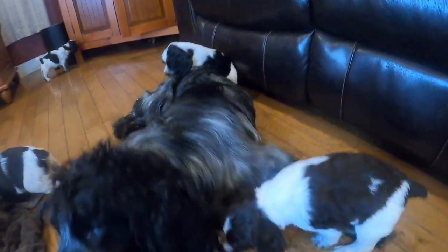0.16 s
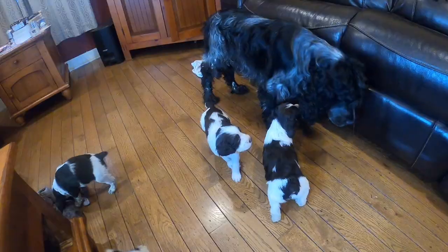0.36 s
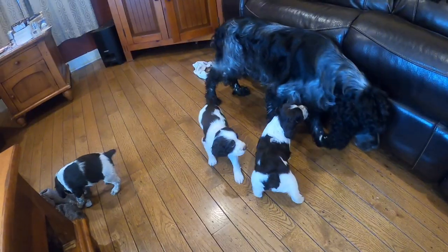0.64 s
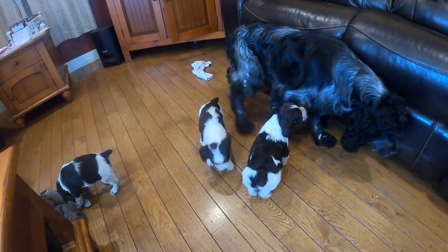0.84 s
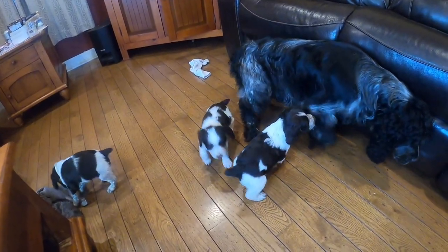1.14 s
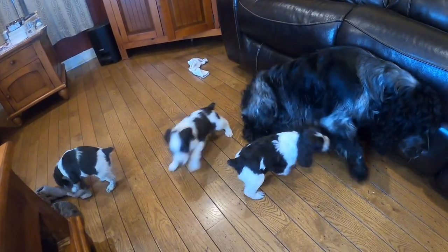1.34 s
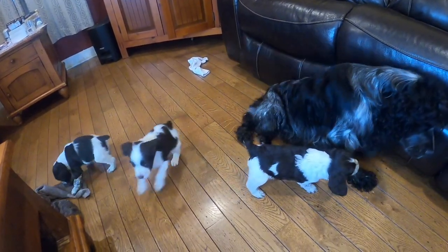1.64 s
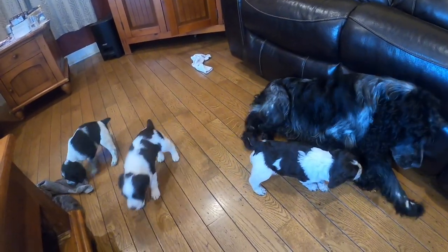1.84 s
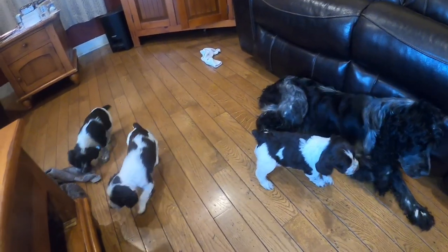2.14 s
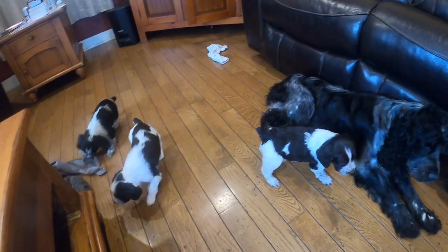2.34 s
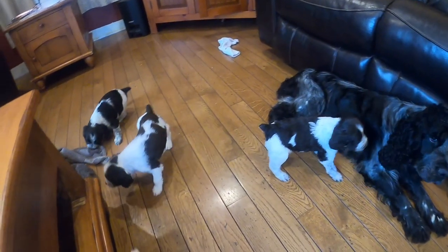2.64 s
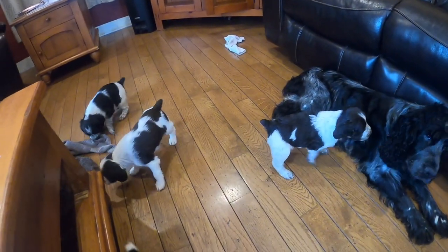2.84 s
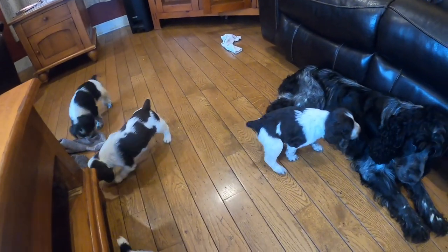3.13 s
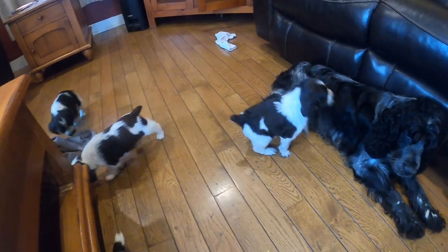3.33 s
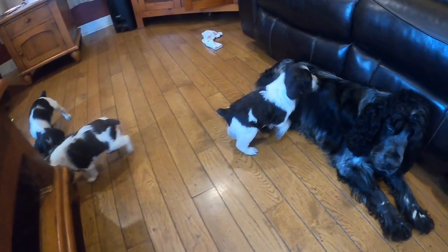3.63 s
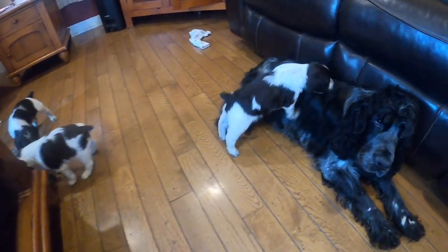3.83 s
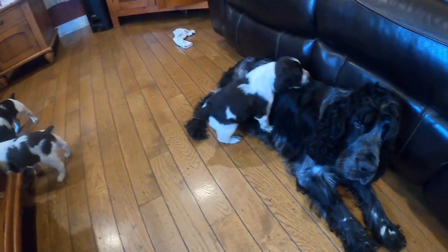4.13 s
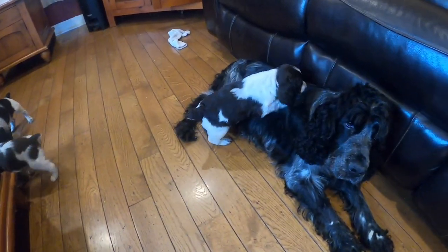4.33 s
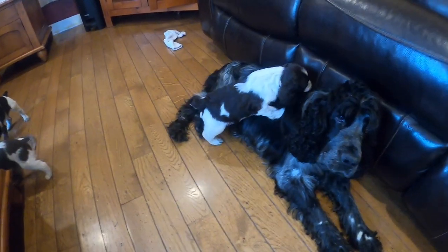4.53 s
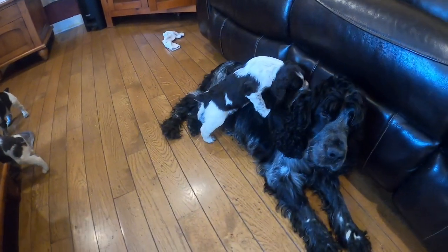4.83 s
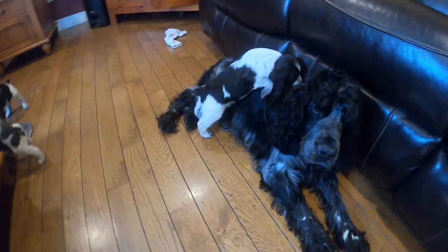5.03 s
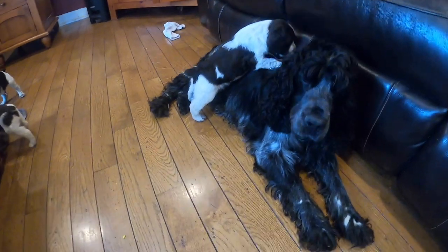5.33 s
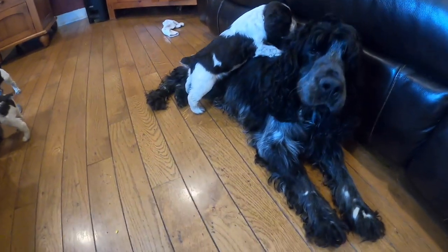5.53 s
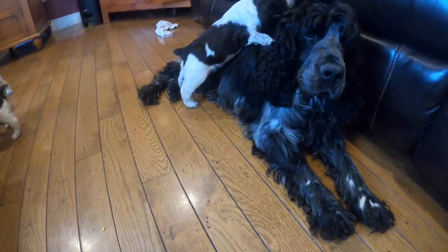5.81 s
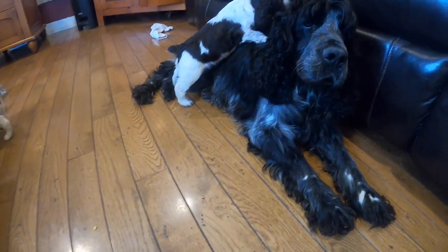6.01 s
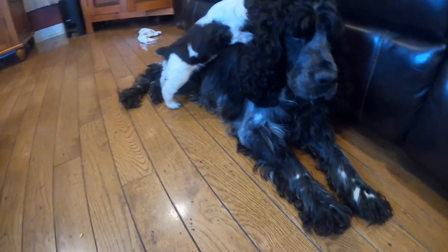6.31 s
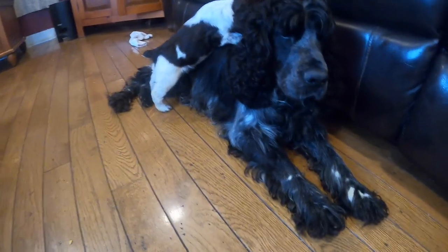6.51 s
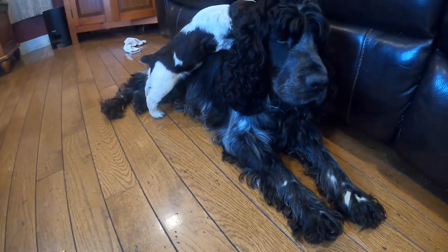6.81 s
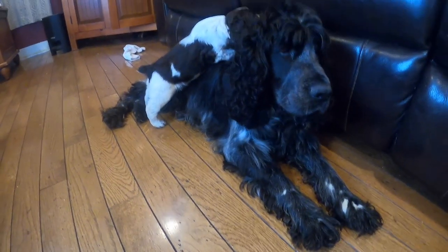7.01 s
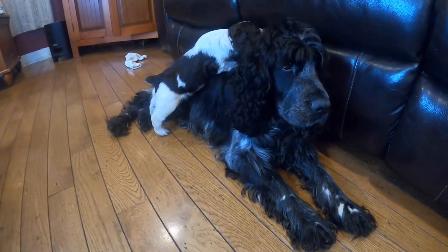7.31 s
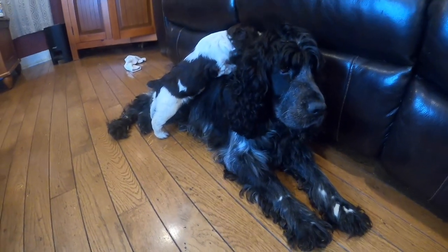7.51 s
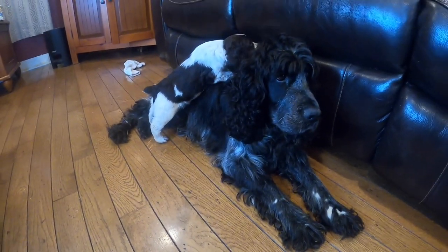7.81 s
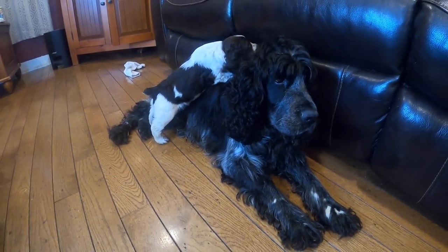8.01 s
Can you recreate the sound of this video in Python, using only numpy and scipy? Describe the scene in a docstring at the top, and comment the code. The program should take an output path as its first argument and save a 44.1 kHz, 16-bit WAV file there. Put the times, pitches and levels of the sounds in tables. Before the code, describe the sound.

Soft paw thumps, dull limb knocks, claw ticks and coat rustling on wooden boards in a quiet living room, fading to near stillness.

```python
"""In a quiet living room with a hardwood floor, puppies scuffle and a big dog lies down by a sofa.
Paws and elbows are soft impulses that ring the floor's modes; claws are chattering noise with a ringing note.
Scratches and padded knocks are trains of stick-slip jumps; sliding pads and coats are friction noise.
A puppy's grunt is a swelling low tone, and a struck collar tag rings once in blurred modes.
Fingers rock the hand-held camera and a nail once taps its shell, over a low rumble and the hush of the house."""
import sys
import numpy as np
from scipy import signal
from scipy.fft import rfft, irfft, next_fast_len
from scipy.io import wavfile
from scipy.ndimage import uniform_filter1d

SR = 44100
rng = np.random.default_rng(int(sys.argv[2]) if len(sys.argv) > 2 else 0)


def wrap_up_sound(samples):
    """Save the sound to the file named by the first command line argument, as 16-bit audio."""
    columns = np.atleast_2d(samples).T
    # keep every value between -1 and 1, then stretch to whole-number steps
    tamed = np.clip(columns, -1, 1)
    steps = np.round(tamed * 32767).astype(np.int16)
    wavfile.write(sys.argv[1], SR, steps)


N = 359706  # samples


def amp(db):
    """Level: decibels become an amplitude gain."""
    return 10 ** (np.asarray(db) / 20)


def unit(x):
    """Normalisation: scaled to rms 1."""
    return x / np.sqrt(np.mean(x ** 2) + 1e-20)


def crest(x):
    """Normalisation: scaled to peak 1."""
    return x / (np.abs(x).max() + 1e-20)


def along(points, hz):
    """Interpolation: (Hz, value) points read on a log frequency axis."""
    f, v = np.transpose(points)
    return np.interp(np.log(hz + 1), np.log(f + 1), v)


def hump(hz, centre_hz, octaves):
    """Resonance band: a bell of height 1 on a log frequency axis."""
    return np.exp(-(np.log2((hz + 1) / centre_hz) / octaves) ** 2)


def filtered(x, response):
    """Linear filtering: the spectrum of x times a response of frequency."""
    n = x.shape[-1]
    m = next_fast_len(n + SR // 10)
    spectrum = rfft(x, m) * response(np.fft.rfftfreq(m, 1 / SR))
    return irfft(spectrum, m)[..., :n]


# Left-right correlation of diffuse sound. Each row: frequency in Hz, likeness from 0 to 1.
STEREO_LIKENESS = [(60, 0.84), (150, 0.41), (300, 0.29), (1000, 0.39), (2500, 0.52), (4500, 0.053),
                   (12000, 0.033)]


def spread(pair, spectrum, alike=STEREO_LIKENESS):
    """Interaural coherence: two unrelated signals become coloured stereo of rms 1 and given likeness."""
    turn = lambda hz: np.arccos(np.clip(along(alike, hz), -1, 1)) / 2
    mid_side = lambda hz: np.array([np.cos(turn(hz)), np.sin(turn(hz))])
    mid, side = filtered(pair, lambda hz: amp(along(spectrum, hz)) * mid_side(hz))
    return unit(np.array([mid + side, mid - side]))


def panned(sound, pan_db):
    """Level difference: the sound leans left by pan_db."""
    return sound * amp([[pan_db / 2], [-pan_db / 2]])


def add(track, s, sound):
    """Superposition: a sound joins the track at s seconds."""
    start = max(round(s * SR), 0)
    track[..., start:start + sound.shape[-1]] += sound[..., :N - start]


def push(hz, cycles):
    """Soft impact: a compliant contact gives a swing of a cycle or two, of peak 1."""
    t = np.arange(SR // 2) / SR
    age = t * hz / cycles
    return crest(age ** 2 * np.exp(-age) * np.sin(2 * np.pi * hz * t))


def swell(length, rise, t60):
    """Energy envelope: the power of one movement rises, holds and dies away (all in seconds)."""
    t = np.arange(int((length + t60) * SR)) / SR
    onset = np.clip(t / rise, 0, 1)
    release = amp(-60 * np.clip((t - length) / t60, 0, 1))
    return (onset * release) ** 2


def struck(blows, modes, rise_s, blur):
    """Modal ringing: shifting contact blurs each mode, which reaches the two sides out of step."""
    out, t = np.zeros((2, N)), np.arange(SR // 2) / SR
    for s, db in blows:
        for hz, level, t60, pan_db in modes:
            unrest = filtered(rng.standard_normal(len(t)), lambda f: f < hz / 10)
            drift = np.cumsum(unrest) * np.sqrt(2 * np.pi * blur * hz / SR)
            phase = rng.random() + rng.random((2, 1)) / 4  # in cycles
            decay = np.clip(t / rise_s, 0, 1) * amp(db + level - 60 * t / t60)
            ring = decay * np.sin(2 * np.pi * (hz * t + phase) + drift)
            add(out, s, panned(ring, pan_db))
    return out


# Reverberation of the room. Each row: frequency in Hz, decay time t60 in seconds.
ROOM_DECAY = [(100, 0.29), (500, 0.52), (2500, 0.28), (6000, 0.49), (12000, 0.35)]


def echo(sound):
    """Reverberation: diffuse noise decaying band by band, drawn anew at each call for each spot on the floor."""
    noise = spread(rng.standard_normal((2, SR // 2)), [(100, 0)])
    hz, t, z = signal.stft(noise, SR, nperseg=256)
    decay = amp(-60 * t / along(ROOM_DECAY, hz)[:, None])
    tail = signal.istft(z * decay, SR)[1]
    tail = tail / np.linalg.norm(tail[0])
    return signal.fftconvolve(sound[None], tail, axes=1)[:, :len(sound)]


# Spectrum of the still room. Each row: frequency in Hz, relative level in dB per Hz.
HUSH_SPECTRUM = [(20, -15.5), (55, -22), (110, -35), (145, 0.5), (230, -8), (400, -14.5), (620, -12),
                 (850, -22), (1150, -17), (2200, -29.5), (3500, -37), (4300, -57), (7500, -35.5),
                 (14000, -59)]


def hush(hush_db=-69):
    """Stationary noise: the steady air of the house."""
    return amp(hush_db) * spread(rng.standard_normal((2, N)), HUSH_SPECTRUM)


PAW_HZ = 137.4  # pitch of a landing of middling weight
TREMOR_DB = -72  # rumble of the hand at rest
JOLT_DB, JOLT_DB_PER_OCTAVE = -22, -7  # heavy, low-pitched landings shake the camera more
JOLT_RISE_S, JOLT_HOLD_S, JOLT_T60 = 0.008, 0.032, 0.96
NUDGE_JOLT_T60 = 0.41  # the hand steadies the camera quickly (s)
# Spectrum of the swaying camera. Each row: frequency in Hz, relative level in dB per Hz.
RUMBLE_SPECTRUM = [(12, 2.5), (22, 19.5), (45, 7.5), (65, -11), (100, -32), (250, -92)]


def rumble():
    """Energy addition: the hand trembles, and each listed landing or nudge adds a burst of low noise power."""
    power = np.full(N, amp(TREMOR_DB) ** 2)
    for blows, t60 in (LANDINGS, JOLT_T60), (NUDGE_TOUCHES, NUDGE_JOLT_T60):
        for s, db, hz, *_ in blows:
            jolt = amp(db + JOLT_DB + JOLT_DB_PER_OCTAVE * np.log2(hz / PAW_HZ))
            add(power, s, jolt ** 2 * swell(JOLT_HOLD_S, JOLT_RISE_S, t60))
    return np.sqrt(power) * spread(rng.standard_normal((2, N)), RUMBLE_SPECTRUM)


# Fingers press on the camera's right side. Each row: start in seconds, level in dB, pitch in Hz.
NUDGE_TOUCHES = [(0.012, -46, 16), (3.193, -33, 60), (3.242, -32.5, 89), (4.565, -31, 128)]
# A fingernail taps the camera's shell. Each row: start in seconds, level in dB.
NAIL_TAPS = [(3.2365, -39)]
# Modes of the shell. Each row: frequency in Hz, relative level in dB, t60 in seconds, left-right in dB.
SHELL_MODES = [(134.5, 5, 0.2, -15), (535, -8, 0.08, -5), (1045, -3, 0.08, -10), (1590, -3, 0.07, 3),
               (1880, 1, 0.08, 0), (2150, -2, 0.04, 1), (3080, 7, 0.022, 7), (3640, 6, 0.018, -1),
               (4020, 10, 0.02, 0), (5130, 6, 0.014, 0), (5900, 5, 0.02, -10)]
# Crack of the nail itself. Each row: frequency in Hz, relative level in dB per Hz.
CRACK_SPECTRUM = [(700, -34), (1000, -2), (1800, 0), (2600, -10), (3800, 2), (6000, -10), (7500, -1),
                  (10000, -28), (14000, -45)]


def handling(far_side_db=-15, shell_db=0, crack_db=12, crack_t60=0.0065, room_db=-14):
    """Rigid-body rocking and shell modes: fingers swing the camera; a nail's tap rings it and the room."""
    touches, t = np.zeros((2, N)), np.arange(SR // 3) / SR
    for s, db, hz in NUDGE_TOUCHES:
        add(touches, s, amp(db) * push(hz, cycles=0.58))
    taps = amp(shell_db) * struck(NAIL_TAPS, SHELL_MODES, rise_s=0.00083, blur=0.024)
    for s, db in NAIL_TAPS:
        nail = rng.standard_normal((2, len(t))) * amp(-60 * t / crack_t60) * (1 - np.exp(-t / 0.0003))
        add(taps, s, amp(db + crack_db) * crest(spread(nail, CRACK_SPECTRUM)))
    rocking = np.array([[-amp(far_side_db)], [1]])  # the far side swings the other way
    return rocking * touches + taps + amp(room_db) * echo(taps[0])


# A puppy's closed-mouth grunt. Each row: start in seconds, length in seconds, pitch in Hz, level in dB.
PUPPY_GRUNTS = [(0.385, 0.051, 207, -43.5)]


def grunts(overtone_db=-24):
    """Voiced tone: a nearly pure low note, with a faint third harmonic, swells and stops."""
    out = np.zeros((2, N))
    for s, length, hz, db in PUPPY_GRUNTS:
        t = np.arange(int(length * SR)) / SR
        third = amp(overtone_db) * np.sin(2 * np.pi * 3 * hz * t)
        tone = np.sin(2 * np.pi * hz * t) + third
        add(out, s, amp(db) * np.sin(np.pi * t / length) ** 2 * tone)
    return out


# The collar tag is struck. Each row: start in seconds, level in dB.
TAG_BLOWS = [(4.931, -56)]
# Modes of the tag, damped by fur. Each row: frequency in Hz, relative level in dB, t60 in seconds,
# left-right in dB.
TAG_MODES = [(3219, -10, .2, 3), (4694, 0, .25, 3), (6293, -9, .35, 3), (7800, -15, .2, 3),
             (9469, -21, .3, 3)]


def collar_tag():
    """Modal ringing: the struck tag sounds its damped modes."""
    return struck(TAG_BLOWS, TAG_MODES, rise_s=0.003, blur=0.0086)


CATCH_RATE, CATCH_DB = 900, -9  # catches a second, their level beside the smooth noise


def friction(spectrum, patchy_db):
    """Dry friction: sliding noise with tiny catches of hair on wood; its colour shifts with the contact."""
    catches = (rng.random(N) < CATCH_RATE / SR) * rng.standard_normal((2, N))
    noise = rng.standard_normal((2, N)) + amp(CATCH_DB) * unit(catches)
    z = signal.stft(noise, nperseg=512)[2]
    patches = uniform_filter1d(rng.standard_normal(z.shape[1:]), size=5, axis=0)
    patches = uniform_filter1d(patches, size=7, axis=1)
    slide = signal.istft(z * amp(patchy_db * unit(patches)))[1][:, :N]
    return spread(slide, spectrum)


# The litter never keeps quite still, but settles. Each row: time in seconds, level in dB.
FIDGETING = [(0, -76), (1.2, -68.5), (2.3, -73), (2.7, -77), (3.4, -72), (5.9, -72), (6.9, -74),
             (7.4, -77.5), (8.16, -84)]
# A dog slides or shifts its weight. Each row: start in seconds, length in seconds, release t60 in seconds,
# pad scuff in dB, coat rustle in dB, hair hiss in dB, left-right in dB.
WEIGHT_SHIFTS = [(0.0, 0.017, 0.31, -48, -47, -62, 2.5), (0.03, 0.27, 0.3, -57.5, -53.5, -66.5, 3),
                 (0.114, 0.05, 0.28, -57, -54, -53.5, -1), (0.317, 0.089, 0.17, -59, -62, -62, 0.5),
                 (0.439, 0.19, 0.23, -65, -67, -72.5, -0.5), (0.892, 0.054, 0.39, -66.5, -72, -65.5, -2),
                 (1.301, 0.27, 0.5, -60, -58.5, -67, -0.5), (1.507, 0.9, 0.62, -60.5, -68, -72, 1),
                 (1.885, 0.28, 0.85, -59.5, -61.5, -68, -2), (2.312, 0.071, 0.56, -79, -52.5, -68, 3),
                 (2.825, 0.21, 0.63, -64.5, -66.5, -68.5, -1.5), (3.103, 0.14, 0.33, -73, -54.5, -54.5, 3),
                 (3.38, 0.098, 0.26, -83, -68.5, -60.5, 3), (3.521, 0.1, 0.73, -75, -65, -65, 3.5),
                 (3.654, 0.25, 0.39, -90, -80, -69.5, 2), (3.858, 0.27, 0.75, -71, -62.5, -65, 2.5),
                 (4.193, 0.22, 0.37, -65, -56, -64, 4), (4.414, 0.17, 0.39, -57, -57.5, -62, 1.5),
                 (4.599, 0.19, 0.54, -54.5, -68.5, -68.5, 3), (4.91, 0.047, 0.41, -50, -63, -68, 2),
                 (5.091, 0.064, 0.29, -57.5, -59.5, -66, 1.5), (5.375, 0.084, 0.36, -55, -71, -67, 1),
                 (5.624, 0.17, 0.37, -62.5, -65.5, -70, -0.5), (6, 0.6, 0.54, -74, -70.5, -71, 2),
                 (6.35, 0.12, 0.42, -67, -82, -67, 1), (6.706, 0.13, 0.35, -68, -75, -77, 4),
                 (6.991, 0.091, 0.39, -64.5, -68.5, -79, 0.5), (7.892, 0.86, 0.39, -63, -84, -78, -1.5)]
FIDGET_SCUFF_DB, FIDGET_HAIR_DB = 4.5, -2.5  # beside its rustle
SLIDE_RISE_S, SLIDE_RISE_SHARE = 0.024, 0.18  # long slides start more slowly


def sliding():
    """Energy addition: stereo gains of scuff, rustle and hair; every slide swells over the fidgeting."""
    s, db = np.transpose(FIDGETING)
    steady = amp(np.interp(np.arange(N) / SR, s, db))
    fidget = steady * amp([FIDGET_SCUFF_DB, 0, FIDGET_HAIR_DB])[:, None, None]
    power = fidget ** 2 * np.ones((2, 1))
    for s, length, t60, *layers_db, pan_db in WEIGHT_SHIFTS:
        gains = np.outer(amp(layers_db), amp([pan_db / 2, -pan_db / 2]))
        rise = SLIDE_RISE_S + SLIDE_RISE_SHARE * length
        add(power, s, gains[..., None] ** 2 * swell(length, rise, t60))
    return np.sqrt(power)


# Spectra of pads on boards, coat on coat, and fine hair. Each row: frequency in Hz, relative level in dB per Hz.
SCUFF_SPECTRUM = [(100, 3), (250, 8.5), (420, -1), (600, -2.5), (850, -5), (1300, 1.5), (1650, -3),
                  (2100, -7), (3200, -12), (6000, -50)]
RUSTLE_SPECTRUM = [(700, -27.5), (1500, -6), (2200, -5.5), (3500, -5), (4600, -8.5), (6000, -14),
                   (10000, -52)]
HAIR_SPECTRUM = [(2500, -29), (4500, -2.5), (5800, -2), (6800, -3.5), (7800, -6), (8400, -11), (9700, -10),
                 (11000, -19), (13000, -19.5), (15000, -45)]
SCUFF_PATCHY_DB, RUSTLE_PATCHY_DB = 3.5, 2.3  # rms wandering of the colour


def coats(scuff, rustle, hair, scuff_db=-1, rustle_db=-1.6, hair_db=-0.6, grip_db=0.57):
    """Friction noise: pads scuff the boards, coats rub and fine hairs hiss as the grip flutters."""
    grip = amp(grip_db * unit(uniform_filter1d(rng.standard_normal(N), size=200)))
    pads = scuff * amp(scuff_db) * friction(SCUFF_SPECTRUM, SCUFF_PATCHY_DB)
    fur = rustle * amp(rustle_db) * friction(RUSTLE_SPECTRUM, RUSTLE_PATCHY_DB)
    hiss = hair * amp(hair_db) * friction(HAIR_SPECTRUM, RUSTLE_PATCHY_DB)
    return grip * (pads + fur + hiss)


# Resonances of the wood. Each row: frequency in Hz, width in Hz, relative level in dB.
WOOD_MODES = [(367, 140, 5.5), (522, 240, 3.5), (707, 157, 2), (1087, 196, 1.5), (1390, 120, 2.5),
              (1740, 320, -5.5)]


def wood(f):
    """Modal response: band-pass resonances of alternating sign add up."""
    total = 0
    for k, (centre, width, db) in enumerate(WOOD_MODES):
        total = total + (-1) ** k * amp(db) * 1j * f * width / (centre ** 2 - f ** 2 + 1j * f * width)
    return total


JUDDER_RATE = 500  # slips a second
# Dull knocks on wood. Each row: start in seconds, level in dB, judder t60 in seconds, favoured centre in Hz,
# left-right in dB.
LIMB_KNOCKS = [(0.002, -42.5, 0.057, 600, 3), (0.152, -46.5, 0.16, 900, 2), (0.171, -40, 0.12, 786, 3),
               (0.189, -45.5, 0.13, 746, 3), (0.415, -51.5, 0.1, 650, 0), (0.482, -55, 0.15, 810, 0),
               (1.448, -40.5, 0.12, 400, 2), (1.514, -45, 0.06, 1400, 0), (1.577, -52, 0.05, 1300, 0),
               (1.7895, -49.5, 0.045, 547, 2), (1.988, -47, 0.051, 403, 0), (3.666, -52.5, 0.04, 1000, 0),
               (4.0625, -43, 0.096, 755, 3), (4.72, -41, 0.06, 550, 7), (4.73, -39, 0.17, 497, 4),
               (4.749, -46, 0.07, 500, 1), (4.7695, -39.5, 0.026, 1210, 10), (4.785, -52, 0.15, 700, 2),
               (4.8424, -35.5, 0.099, 790, 8), (4.855, -40, 0.04, 850, 4), (4.865, -41, 0.06, 1200, 1),
               (4.877, -45.5, 0.056, 750, 1), (4.889, -43, 0.1, 1120, 1), (4.928, -33, 0.11, 630, 7),
               (4.957, -41.5, 0.25, 700, 5), (5.317, -56, 0.13, 900, 9), (5.55, -50.5, 0.04, 1050, 0),
               (5.624, -47.5, 0.069, 760, 8), (5.653, -52, 0.13, 1100, 2), (5.71, -50, 0.029, 1000, 2),
               (5.767, -49.5, 0.16, 420, -1), (7.632, -55.5, 0.024, 1500, 0), (7.968, -60, 0.06, 1500, 0)]


def knocks(knock_db=0, room_db=-9, blow_t60=0.01, scrape_db=-9, pad_hz=3000, focus_db=7, focus_octaves=0.61):
    """Impact and stick-slip: padded limbs bump the wood and judder on; each spot favours other resonances."""
    out, t = np.zeros((2, N)), np.arange(SR // 3) / SR
    for s, db, t60, centre_hz, pan_db in LIMB_KNOCKS:
        focus = lambda f: amp(focus_db * hump(f, centre_hz, focus_octaves))
        padded = lambda f: wood(f) * focus(f) / (1 + 1j * f / pad_hz) ** 2  # flesh softens the treble
        slips = unit((rng.random(len(t)) < JUDDER_RATE / SR) * rng.uniform(-0.94, 1, len(t)))
        blow = amp(-60 * t / blow_t60) * rng.standard_normal(len(t))
        force = blow + slips * amp(scrape_db - 60 * t / t60)
        knock = amp(db + knock_db) * crest(filtered(force, padded))
        add(out, s, panned(knock, pan_db) + amp(room_db) * echo(knock))
    return out


SLIP_RATE = 1100  # slips a second
# A claw drags over the grain. Each row: start in seconds, length in seconds, level in dB, ring in Hz,
# left-right in dB.
CLAW_DRAGS = [(0.068, 0.015, -40, 1800, 0), (0.128, 0.045, -29.5, 3820, 3), (0.151, 0.038, -41, 1200, 4),
              (0.23, 0.096, -44, 1750, 5), (0.255, 0.031, -44, 4450, 5), (0.28, 0.025, -46, 2700, 3),
              (0.35, 0.064, -46, 1850, 1), (1.464, 0.022, -41, 3550, 0), (3.912, 0.034, -42.5, 4840, -2),
              (4.567, 0.027, -40, 3060, 0), (5.413, 0.022, -43, 2840, -3), (5.447, 0.022, -46, 2500, 0),
              (5.777, 0.024, -40.5, 3240, 0), (6.76, 0.054, -60, 2600, 0), (7.026, 0.05, -52.5, 2200, -2)]


def scratches(ring_db=12, ring_octaves=0.17, growth_db=5, room_db=-6):
    """Stick-slip: a dragged claw moves in tiny uneven jumps that grow until it lets go."""
    out, t = np.zeros((2, N)), np.arange(SR // 3) / SR
    for s, length, db, ring_hz, pan_db in CLAW_DRAGS:
        slips = (rng.random(len(t)) < SLIP_RATE / SR) * rng.standard_normal((2, len(t)))
        slips = np.tanh(slips) * (t < length) * amp(growth_db * np.minimum(t / length, 1))
        colour = lambda hz: amp(along(CLAW_SPECTRUM, hz) + ring_db * hump(hz, ring_hz, ring_octaves))
        scratch = amp(db) * crest(spread(filtered(slips, colour), [(100, 0)]))
        add(out, s, panned(scratch, pan_db) + amp(room_db) * echo(scratch[0]))
    return out


CLAW_RING_T60 = 0.022  # the note of one claw (s)
CLAW_HZ, CLAW_BODY_DB, CLAW_BODY_DB_PER_OCTAVE = 1910, 11.5, -11.5  # a low click has more wood in it
# Colour of claw on wood. Each row: frequency in Hz, relative level in dB.
CLAW_SPECTRUM = [(300, -15.5), (800, -22), (1150, -11), (1600, -4.5), (2400, -1), (3100, 0.5), (3700, 0),
                 (4800, -4.5), (6000, -8), (8000, -14.5), (11000, -27), (15000, -42)]
# Claws strike the boards. Each row: start in seconds, level in dB, chatter t60 in seconds, ring in Hz,
# ring in dB, treble edge in dB, room in dB, left-right in dB.
CLAW_STRIKES = [(0.002, -34, 0.025, 2410, 1, -5.5, -2.5, -3), (0.0709, -42, 0.049, 1710, 7, -4, -3, 0),
                (0.1372, -42, 0.018, 3000, -9, 10, -8, 0), (0.1759, -34.5, 0.033, 3670, -7, 2, -8, 3),
                (0.2245, -44.5, 0.03, 1570, 6, -12, 1, 9), (0.2623, -40, 0.018, 2150, 2.5, 5, -3, 10),
                (0.3559, -49, 0.027, 2120, 7, 4, -1, 4), (0.713, -52.5, 0.027, 5000, 2, 18, -6, -3),
                (0.783, -47.5, 0.017, 2150, -1, -19, 2, -1), (0.839, -52, 0.04, 2560, 1, 6, -2, -1),
                (1.205, -56, 0.03, 2020, 8, -12, -11, 0), (1.402, -47, 0.04, 1890, -8, 0, -9, 0),
                (1.4528, -33, 0.019, 2990, 2, -4, -4, -1), (1.4568, -44, 0.018, 4150, -2, -6, -10, 0),
                (1.492, -39, 0.024, 2900, -7, 1, -12, -1), (1.4982, -43.5, 0.015, 4200, -3, 8, -8, 1),
                (1.711, -52, 0.027, 1400, -2, 0, -13, 0), (1.791, -55, 0.027, 1500, -6, 3, 2, 1),
                (1.823, -45, 0.018, 1330, 4.5, 6, -17, -2), (2.085, -52, 0.027, 1270, 6, -5, -6, 0),
                (2.3358, -35, 0.02, 2210, 3, 8, 1, 0), (2.3361, -27, 0.017, 3700, -1, -2.5, -5, -4),
                (3.004, -52.5, 0.04, 3850, -2, 3, -2, 1), (3.543, -47.5, 0.019, 5450, -4, 14, -7, -4),
                (3.587, -48.5, 0.027, 2130, -10, 6, 2.5, -6), (3.9097, -53.5, 0.05, 1740, 8.5, 12, 0, -6),
                (4.659, -39, 0.02, 1900, -13, 8, -3.5, 1), (4.691, -36, 0.018, 1640, -11, 6.5, -4.5, 1),
                (4.7302, -37, 0.017, 2400, -18, -0.5, -4, 1), (4.931, -33.5, 0.022, 1670, -5, 9, -7, 4),
                (5.1208, -52, 0.018, 2010, -6, 11, -3, 4), (5.1633, -40, 0.016, 4700, -10, 9.5, -3.5, 2),
                (5.3976, -46.5, 0.035, 2680, -5, 1, -6, 6), (5.4175, -48.5, 0.025, 2800, -2, 9, -3, -1),
                (5.456, -47, 0.027, 1390, -2, -6, -15, 2), (5.6974, -47, 0.03, 2000, -6, 3, -8, -1),
                (5.711, -47, 0.027, 1900, -2, 3, -17, 8), (5.903, -50.5, 0.035, 1450, 0, 9, -1.5, 7),
                (6.047, -53.5, 0.027, 5540, 2, 14, -3, 0), (8.03, -61, 0.03, 7450, 6, 30, -2, 5)]


def clicks(click_db=-17.0, note_db=-4, apart=0.3, wet_db=0):
    """Hard impact: a claw chatters for milliseconds and rings at its own pitch, then the room takes over."""
    out, t = np.zeros((2, N)), np.arange(SR // 25) / SR
    rise = 1 - np.exp(-t / 0.00035)
    for s, db, t60, ring_hz, ring_db, edge_db, room_db, pan_db in CLAW_STRIKES:
        body_db = CLAW_BODY_DB + CLAW_BODY_DB_PER_OCTAVE * np.log2(ring_hz / CLAW_HZ)
        tilt = [(1200, body_db), (3200, 0), (6500, edge_db)]
        colour = lambda hz: amp(along(CLAW_SPECTRUM, hz) + along(tilt, hz))
        noise = filtered(rng.standard_normal((2, len(t))), colour)
        size = amp(db + click_db)
        note_gain = amp(db + note_db + ring_db - 60 * t / CLAW_RING_T60) * rise
        note = note_gain * np.sin(2 * np.pi * ring_hz * t)
        mid, side = size * unit(noise * amp(-60 * t / t60) * rise)
        chatter = np.array([mid + apart * side, mid - apart * side])
        add(out, s - .0003, panned(note + chatter, pan_db))
        late_impulse = signal.unit_impulse(len(t), len(t) // 10)  # the walls answer a little later
        snap = note + size * unit(filtered(late_impulse, colour))
        add(out, s, amp(room_db + wet_db) * echo(np.pad(snap, (0, SR // 3))))
    return out


PATTER_RATE, PATTER_HZ = 13, 180  # paws a second, their middle pitch
# A puppy patters lightly about. Each row: start in seconds, end in seconds, level in dB.
PATTER_RUNS = [(1.555, 2.02, -52), (6.407, 6.5, -52.5)]


def patter(scatter_db=2, hard_db=-3):
    """Random scatter: light, uneven steps as (start s, level dB, pitch Hz, hardness dB)."""
    steps = []
    for start, end, db in PATTER_RUNS:
        times = np.arange(start, end, 1 / PATTER_RATE)
        for s, (late, loud, high) in zip(times, rng.standard_normal((16, 3))):
            when = s + 0.1484 * late / PATTER_RATE
            steps.append((when, db + scatter_db * loud, PATTER_HZ * np.exp(0.24 * high), hard_db))
    return steps


BOARD_SHIFT, BOARD_SCATTER_DB = 0.018, 5  # each spot rings a little differently: pitch share, level
# The floor on its joists. Each row: frequency in Hz, relative level in dB, t60 in seconds.
BOARD_MODES = [(97.6, -4.5, 0.41), (118, -6, 0.28), (136.6, -5, 0.34), (191.6, -5.5, 0.52), (246, -7, 0.2),
               (325, -2.5, 0.27), (393, -8, 0.18)]


def boards(t):
    """Modal ringing: the floor's decaying modes as woken from one spot."""
    ring = np.zeros(len(t))
    for hz, db, t60 in BOARD_MODES:
        loud, high = rng.standard_normal(2)
        decay = amp(db + BOARD_SCATTER_DB * loud - 60 * t / t60)
        ring += decay * np.sin(2 * np.pi * hz * (1 + BOARD_SHIFT * high) * t)
    return ring


SKID_DB, SKID_DB_PER_OCTAVE = -17, 11  # light, high-pitched paws skid more
# A pad juddering on varnish. Each row: frequency in Hz, relative level in dB.
SKID_SPECTRUM = [(120, -14.5), (190, 8), (260, -4), (325, -1.5), (400, -6), (500, -16), (900, -28),
                 (2500, -61)]
# The floor moves nearly as one. Each row: frequency in Hz, left-right likeness from 0 to 1.
FLOOR_LIKENESS = [(60, 0.88), (250, 0.97), (1000, 0.71)]
# Paws, elbows and bodies land, the heavier the lower. Each row: start in seconds, level in dB, pitch in Hz,
# hardness in dB (treble lift; negative for soft fur).
LANDINGS = [(0.225, -47, 178, 2), (1.406, -39.5, 187, 0.5), (1.424, -40.5, 125, 4), (1.457, -36, 120, 1),
            (1.5, -32, 103, 0), (1.579, -43, 217, 0), (1.604, -36, 127, -3), (1.684, -40.5, 142, 4),
            (1.715, -36, 152, 1), (1.753, -38.5, 137, -1), (1.784, -41.5, 139, 0), (1.845, -44, 265, -4),
            (1.985, -40, 185, -3), (2.155, -48.5, 206, -9), (2.206, -46, 74.5, 2), (2.251, -33.5, 100, 1),
            (2.272, -34, 58.3, -5), (2.308, -34.5, 76.5, 0), (2.349, -40, 84, -2), (2.405, -50.5, 92, 0),
            (2.471, -46.5, 60.4, 1), (3.39, -47, 186, -16), (3.435, -45, 175, -4), (3.454, -35, 136, -17),
            (3.477, -39, 150, -11), (3.492, -43.5, 135, -11), (3.53, -45, 48, -9), (3.577, -45.5, 193, -10),
            (3.673, -56.5, 188, -3), (4.06, -42, 187, 0), (4.076, -36.5, 102, -3), (4.126, -46.5, 69, -4),
            (4.629, -33.5, 23.3, -1.5), (4.691, -43, 86.5, 6), (4.728, -31, 164, -5), (4.927, -29, 206, -3),
            (4.947, -24, 140, 1), (4.966, -21.5, 62.3, -4), (4.995, -24, 96, -4), (5.045, -34.5, 94, -4),
            (5.074, -33, 50.6, -6), (5.109, -32.5, 82, -9), (5.164, -36.5, 90, -5), (5.205, -46, 71, -4),
            (5.317, -41, 138, 0), (5.477, -34.5, 65.4, 1), (5.503, -37, 53, 3), (5.53, -36.5, 37.3, -1),
            (5.721, -45.5, 96, 2), (5.765, -37, 176, -9), (6.358, -47.5, 170, 2), (6.385, -46, 151, 0),
            (7.604, -47.5, 170, -4), (7.615, -46, 84, -0.5)]


def thumps(push_db=-1, ring_db=-8, shudder_db=-16, shudder_t60=0.55, skid_t60=0.29):
    """Impact on a modal plate: each landing bends the floor; boards ring and shudder while the pad skids."""
    out, t = np.zeros((2, N)), np.arange(SR // 2) / SR

    def burst(colour, t60):
        """Decaying noise: a diffuse burst with a soft onset."""
        noise = spread(rng.standard_normal((2, len(t))), colour, FLOOR_LIKENESS)
        return noise * amp(-60 * t / t60) * (1 - np.exp(-t / 0.0037))

    for s, db, hz, hard_db in LANDINGS + patter():
        bend = push(hz, cycles=0.4)
        ring = crest(signal.fftconvolve(bend, boards(t))[:len(t)])
        shudder_colour = [(hz / 4, -6), (hz, 0), (hz * 2, -12), (hz * 4, -32), (hz * 30, -110)]
        shudder = burst(shudder_colour, shudder_t60)
        skid_gain = amp(SKID_DB + SKID_DB_PER_OCTAVE * np.log2(hz / PAW_HZ))
        skid = skid_gain * burst(SKID_SPECTRUM, skid_t60)
        landing = amp(push_db) * bend + amp(ring_db) * ring + amp(shudder_db) * shudder + skid
        overtones = lambda f: (1 + 1j * f / (2 * hz) * amp(hard_db)) / (1 + 1j * f / (2 * hz))
        add(out, s, amp(db) * filtered(landing, overtones))
    return out


def scene():
    """Superposition: all the dogs' movements in the quiet room."""
    background = hush() + rumble() + handling()
    contacts = collar_tag() + knocks() + scratches() + clicks() + thumps()
    return background + grunts() + coats(*sliding()) + contacts


TOP_HZ = 14850  # band limit
LEFT_LAG_S = 0.00003  # the dogs lie a little to the right
# The two microphones differ. Each row: frequency in Hz, left-right in dB.
MICROPHONE_BALANCE = [(300, -1), (1000, -2), (2200, 3), (4000, 1.5), (8000, -0.5)]


def record(dry):
    """Linear transduction: two slightly unlike microphones, with nothing kept above the band limit."""
    sides = np.array([[0.5], [-0.5]])
    balance = lambda hz: amp(sides * along(MICROPHONE_BALANCE, hz))
    lag = lambda hz: np.exp(-2j * np.pi * hz * sides * LEFT_LAG_S)
    return filtered(dry, lambda hz: balance(hz) * lag(hz) * (hz < TOP_HZ))


dry = scene()
out = record(dry)
wrap_up_sound(out)
```